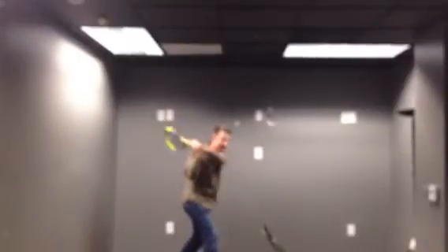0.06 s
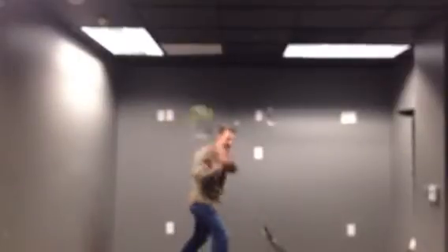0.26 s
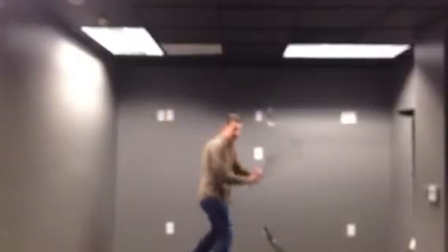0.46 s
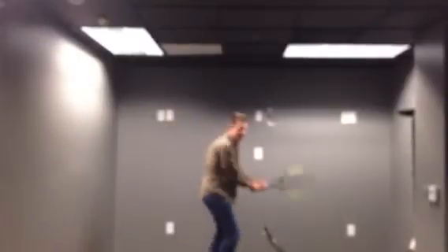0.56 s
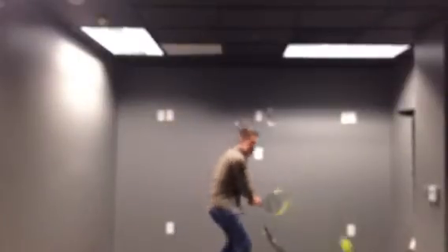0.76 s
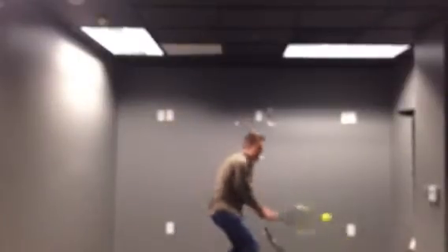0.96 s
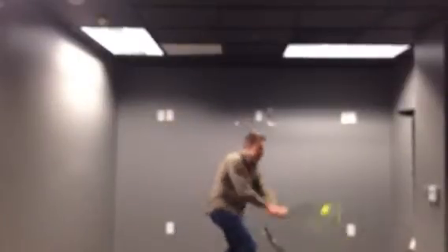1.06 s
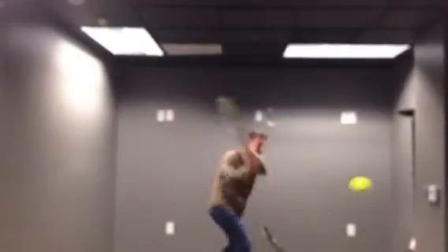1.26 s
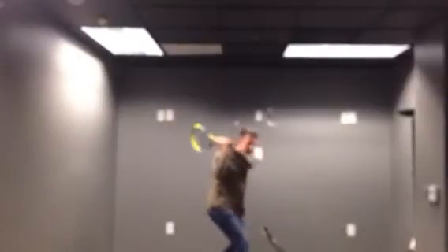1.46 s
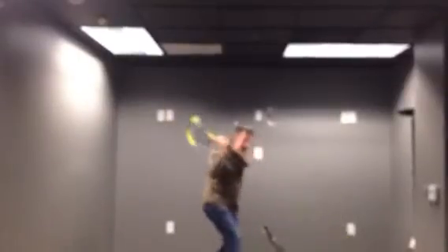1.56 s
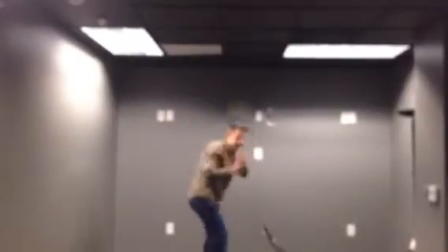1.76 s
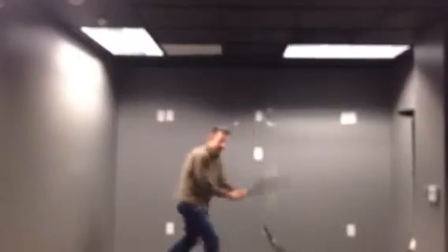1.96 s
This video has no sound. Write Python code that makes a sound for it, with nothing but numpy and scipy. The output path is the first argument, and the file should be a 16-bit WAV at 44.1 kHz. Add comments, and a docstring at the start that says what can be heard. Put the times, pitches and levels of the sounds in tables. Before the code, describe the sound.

A tennis ball smacks a hard wall twice, close and booming, in a small echoing room

```python
"""In a small, hard, echoing room a tennis ball is rallied against the near wall, beside the microphone.
Ventilation, filtered noise, hums faintly; shoes and shaken walls thud as low decaying sines.
Loose fittings tick; two ball bounces and a faint shoe knock reach the ear by discrete paths and reverberation.
The racket cracks at the far end as coloured reflections with a ringing ping; the first stroke is a dying echo.
Loudest are two blows on the wall panel, whose damped modes crack and boom into the room's echo."""
import sys
import numpy as np
from scipy import signal
from scipy.fft import rfft, irfft
from scipy.io import wavfile
from scipy.ndimage import uniform_filter1d

SR = 44100
rng = np.random.default_rng(int(sys.argv[2]) if len(sys.argv) > 2 else 0)


def digitize_waveform(pressure):
    """Quantize a signal to 16-bit integers and store it at the path in sys.argv[1].

    Rows of a 2-D input are taken as channels; values are limited to [-1, 1].
    """
    field = np.atleast_2d(pressure).T
    bounded = np.clip(field, -1, 1)
    quanta = np.round(bounded * 32767).astype(np.int16)
    wavfile.write(sys.argv[1], SR, quanta)


N = 90405  # length in samples


def from_db(db):
    """Decibels are logarithmic: 20 dB is a tenfold amplitude gain."""
    return 10 ** (np.asarray(db) / 20)


def at_hz(points, hz):
    """Pitch is logarithmic: a (Hz, value) table is interpolated along log frequency."""
    points = np.array(points)
    return np.interp(np.log(np.maximum(hz, 1)), np.log(points[:, 0]), points[:, 1])


def add(out, start_s, sound):
    """Superposition: pressures add; whatever falls outside the scene is cropped."""
    start = int(round(start_s * SR))
    sound = sound[max(-start, 0):N - start]
    start = max(start, 0)
    out[start:start + len(sound)] += sound


def seconds():
    """Sampled time: sample number over sample rate."""
    return np.arange(N) / SR


def unit_energy(x):
    """Energy is the sum of squares; scale it to that of one unit click."""
    return x / np.sqrt(np.sum(x ** 2))


def colour(x, points):
    """Minimum-phase filtering: the folded cepstrum of a (Hz, dB) response gives a causal filter."""
    size = 2 ** 17
    hz = np.arange(size // 2 + 1) * SR / size
    cepstrum = irfft(np.log(from_db(at_hz(points, hz))))
    # fold negative time onto positive time
    cepstrum[1:size // 2] *= 2
    cepstrum[size // 2 + 1:] = 0
    response = np.exp(rfft(cepstrum))
    return irfft(rfft(x, size) * response)[:N]


def ring(force, hz, t60):
    """Driven damped oscillator: a two-pole resonator answers a unit click with a sine of height near 1."""
    radius = from_db(-60 / (t60 * SR))
    angle = 2 * np.pi * hz / SR
    feedback = [1, -2 * radius * np.cos(angle), radius * radius]
    return signal.lfilter([0, np.sin(angle)], feedback, force + 1e-18)


def tone(hz, db, t60):
    """Free damped vibration: a sine loses 60 dB in each t60."""
    t = seconds()
    return from_db(db - 60 * t / t60) * np.sin(2 * np.pi * hz * t)


def scatter(envelope, count=6):
    """Phase dispersion: random phases smear a click while its spectrum stays even."""
    x = rng.standard_normal(len(envelope)) * envelope
    for _ in range(count):
        spectrum = rfft(x, 2 * len(x))
        flat = spectrum / (np.abs(spectrum) + 1e-12)
        x = irfft(flat)[:len(x)]
    return np.pad(unit_energy(x), (0, N - len(x)))


def early():
    """Early reflections: dense arrivals modelled as noise that builds and dies quickly."""
    t60_s, build_s = 0.22, 0.0015
    t = seconds()
    decay = from_db(-60 * t / t60_s)
    return unit_energy(rng.standard_normal(N) * decay * (1 - np.exp(-t / build_s)))


def echo():
    """Diffuse reverberation: absorption varies with frequency, so each third-octave has its own decay."""
    # The room's decay. Each row: frequency in Hz, t60 in seconds.
    room_t60 = [(60, 0.54), (180, 0.54), (350, 0.42), (550, 0.33), (800, 0.44), (1100, 0.55), (1500, 0.61),
                (2100, 0.76), (3200, 0.72), (5000, 0.6), (8000, 0.32), (14000, 0.56)]
    build_s, size = 0.0009, 2 ** 16
    t = np.arange(size) / SR
    hz = np.arange(size // 2 + 1) * SR / size
    noise = rfft(rng.standard_normal(size))
    out = np.zeros(size)
    for low in 20 * 2 ** (np.arange(30) / 3):
        band = irfft(noise * ((hz >= low) & (hz < low * 2 ** (1 / 3))))
        centre = low * 2 ** (1 / 6)
        out += band * from_db(-60 * t / at_hz(room_t60, centre))
    out *= 1 - np.exp(-t / build_s)
    return np.pad(out, (0, N - size)) / np.sqrt(SR / 20)


def ventilation():
    """Stationary broadband noise: spectral shaping leaves a low rumble under a faint hiss."""
    # Spectrum of the air noise. Each row: frequency in Hz, relative level in dB.
    air_colour = [(20, -37), (40, -7.5), (58, 3), (85, -11.5), (190, -16), (300, -19.5), (500, -29),
                  (1500, -27.5), (3000, -33.5), (15000, -40)]
    air = colour(rng.standard_normal(N), air_colour)
    return from_db(-61) * air / np.std(air)


def thumps():
    """Soft impact: gradual contact rounds the onset of a damped low mode, for shoes and shaken walls."""
    # Each row: start in seconds, level in dB before the onset is rounded, frequency in Hz, t60 in seconds.
    thump_rows = [(0.295, -28, 55, 0.43), (0.300, -8.5, 100, 0.079), (0.718, -33.5, 149.6, 0.058),
                  (0.882, -40.5, 57, 0.16), (0.883, -42, 121, 0.15), (1.652, -13, 112, 0.082),
                  (1.681, -11.5, 162, 0.065), (1.714, -21, 180, 0.089)]
    contact_s = 0.0029
    onset = 1 - np.exp(-(seconds() / contact_s) ** 2)
    out = np.zeros(N)
    for start_s, db, hz, t60 in thump_rows:
        add(out, start_s, tone(hz, db, t60) * onset)
    return out


def rattle():
    """Secondary impacts: loose fittings, shaken by the blows, tick as brief scattered clicks."""
    # Each row: start in seconds, gain in dB.
    ticks = [(0.2278, -7), (1.6226, -13), (1.6264, -14), (1.6335, -8), (1.659, -13)]
    # Spectrum of a tick. Each row: frequency in Hz, gain in dB.
    tick_colour = [(400, -19), (1500, -4.5), (4500, -8), (6500, -13.5), (9000, -20), (15000, -33.5)]
    early_db = -10.5
    out = np.zeros(N)
    for start_s, db in ticks:
        add(out, start_s, from_db(db) * (scatter(np.ones(30)) + from_db(early_db) * early()))
    return colour(out, tick_colour)


def floor_knocks():
    """Impact and image sources: delayed copies and reverberation repeat each knock; modes ring on."""
    # Two ball bounces and, between them, a faint shoe knock.
    # Each row: start in seconds, gain in dB, low-pass cutoff in Hz.
    knocks = [(0.6252, -5.5, 6000), (0.837, -26.5, 600), (1.9956, -7.5, 1870)]
    # Spectrum of a knock on the floor. Each row: frequency in Hz, gain in dB.
    knock_colour = [(60, 10), (170, 17), (480, 22.5), (700, 11.5), (1150, 7), (1450, 1.5), (2200, -4.5),
                    (2900, -18), (3900, -16.5), (6000, -29), (14000, -34)]
    # Ball and floor resonances. Each row: frequency in Hz, t60 in seconds,
    # level in dB at the first bounce, level in dB at the last.
    bounce_modes = [(180, 0.21, -31.5, -31), (323.7, 0.21, -48, -38), (414.5, 0.14, -37, -46),
                    (506, 0.18, -31.5, -39.5), (695, 0.081, -41, -34.5), (1044, 0.11, -32.5, -50.5),
                    (1273, 0.026, -43, -34.5)]
    # First paths to the microphone. Each row: delay in seconds, gain in dB.
    knock_paths = [(0, -7), (0.004, -6), (0.0105, -8), (0.027, -13)]
    early_db, echo_db = 1, -2
    out = np.zeros(N)
    for start_s, db, dull_hz in knocks:
        paths = from_db(early_db) * early() + from_db(echo_db) * echo()
        for delay_s, path_db in knock_paths:
            add(paths, delay_s, from_db([path_db]))
        pop = colour(paths, knock_colour)
        dulled = signal.lfilter(*signal.butter(1, dull_hz, fs=SR), pop)
        add(out, start_s, from_db(db) * dulled)
    # only the ball bounces, first and last, set the modes ringing
    for bounce, (start_s, *_) in enumerate((knocks[0], knocks[-1])):
        for k, (hz, t60, *mode_db) in enumerate(bounce_modes):
            add(out, start_s, (-1) ** k * tone(hz, mode_db[bounce], t60))
    return out


def racket():
    """Direct and reverberant fields: a far crack is thin, its bass comes by echo; strings, frame and room ring."""
    # Each row: start in seconds, gain in dB.
    strokes = [(-0.26, -9.5), (1.147, -0.5)]
    # Ball on the strings. Each row: frequency in Hz, gain in dB.
    stroke_colour = [(50, -7.5), (110, 11.5), (190, 19), (300, 14.5), (450, 2), (620, 8.5), (740, -3.5),
                     (1100, 11.5), (1280, 5.5), (1520, 11.5), (2300, -3), (2800, -9.5), (4400, -10.5),
                     (8000, -19), (15000, -31.5)]
    # Ringing strings, frame and room. Each row: frequency in Hz, relative level in dB, t60 in seconds.
    ping_modes = [(199, 11, 0.5), (286, 7, 0.4), (610, -12, 0.92), (930, -7, 0.4), (1050, 5.5, 0.34),
                  (1125, 4, 0.46), (1500, 3, 0.68), (1560, 15.5, 0.21), (1620, -3.5, 0.43)]
    direct_db, early_db, echo_db, ping_db = -20, -1.5, 0.5, -51
    thin_hz = 320  # the first paths carry little bass
    ping = sum(tone(hz, ping_db + mode_db, t60) for hz, mode_db, t60 in ping_modes)
    out = np.zeros(N)
    for start_s, db in strokes:
        first = from_db(direct_db) * scatter(np.hanning(180)) + from_db(early_db) * early()
        first = signal.lfilter(*signal.butter(2, thin_hz, "high", fs=SR), first)
        crack = colour(first + from_db(echo_db) * echo(), stroke_colour)
        add(out, start_s, from_db(db) * (crack + ping))
    return out


def blow_force(start_s, contact_s, swell_db):
    """Impact excitation: a dull noise swell leads into a short contact with softened treble."""
    attack_s, rise_s, attack_dull_hz, crack_dull_hz = 0.021, 0.017, 3332, 7360
    t = seconds()
    rising = np.exp(t[t < attack_s] / rise_s) - 1
    swell = unit_energy(rng.standard_normal(len(rising)) * rising)
    swell = signal.sosfilt(signal.butter(6, attack_dull_hz, fs=SR, output="sos"), swell)
    contact = scatter(np.ones(int(contact_s * SR)))
    force = np.zeros(N)
    add(force, start_s - attack_s, from_db(swell_db) * swell)
    add(force, start_s, signal.lfilter(*signal.butter(2, crack_dull_hz, fs=SR), contact))
    return force


def wall():
    """Modal excitation: the spot struck sets how strongly each panel and room mode answers a blow."""
    # Each row: start in seconds, contact in seconds, gain of the swell in dB, thin tone in Hz, its level in dB,
    # boom's lead in seconds, boom's rise in seconds, gain of all modes in dB, gain of the echo in dB.
    wall_hits = [(0.2158, 0.0028, -15, 2755, -33, 0.00025, 0.0024, 3, 5.5),
                 (1.6132, 0.0018, -4, 3083, -26, 0.00043, 0.004, 2.5, 4.5)]
    # The panel's crack, its boom, and the low room resonances it wakes. Each row: frequency in Hz,
    # t60 in seconds, relative level in dB from the first spot, relative level in dB from the second.
    crack_modes = [(484, 0.027, -19.5, -12), (906, 0.026, -14.5, -18), (1423, 0.013, -15, -14),
                   (1812, 0.012, -10.5, -16), (2258, 0.02, -16, -15.5), (2810, 0.01, -10.5, -51),
                   (3320, 0.014, -11, -24.5), (4200, 0.0051, -19, -21.5), (4800, 0.0026, -26.5, -43.5),
                   (5767, 0.006, -23, -42)]
    boom_modes = [(60.5, 0.041, -36.5, -13.5), (118, 0.12, -12.5, -17.5), (173, 0.02, -22, -2.5),
                  (232.5, 0.095, -8, -28), (285.4, 0.15, -31.5, -18.5), (365, 0.061, -15, -24.5)]
    room_modes = [(92.6, 0.47, -24, -24.5), (138.45, 0.49, -31.5, -23), (164, 0.58, -19.5, -38.5),
                  (201.5, 0.71, -38, -33)]
    # Faint ring that lingers. Each row: frequency in Hz, level in dB.
    wall_ring = [(1265, -49.5), (1750, -46), (1852, -45), (2213, -47)]
    # Spectrum of the echo. Each row: frequency in Hz, gain in dB from the first spot, gain in dB from the second.
    wall_echo = np.array([(29.4, 13.5, 33), (63, 28.5, 25.5), (113, 32.5, 32), (197, 32, 30), (345, 19, 9),
                          (490, 20.5, 12), (750, 2.5, 4), (1240, 10.5, 5), (1710, 10, 7), (2350, 5, 6.5),
                          (2800, -7, -12), (3180, -1, -5), (5100, -12, -17.5), (8500, -29.5, -40.5),
                          (15000, -40, -51.5)])
    ring_t60_s, tone_swell_s, tone_lead_s = 0.75, 0.007, 0.021
    out, t = np.zeros(N), seconds()
    for spot, hit in enumerate(wall_hits):
        start_s, contact_s, swell_db, tone_hz, tone_db, lead_s, rise_s, modes_db, echo_db = hit
        force = blow_force(start_s, contact_s, swell_db)
        for k, (hz, t60, *spot_db) in enumerate(crack_modes):
            out += (-1) ** k * from_db(modes_db + spot_db[spot]) * ring(force, hz, t60)
        for hz, db in wall_ring:
            add(out, start_s, tone(hz, db, ring_t60_s))

        # a thin tone swells and fades around the blow
        age = t - start_s + lead_s
        tone_envelope = np.exp(-np.abs(age) / tone_swell_s) * (age > -tone_lead_s)
        out += from_db(tone_db) * tone_envelope * np.sin(2 * np.pi * tone_hz * age)

        for k, (hz, t60, *spot_db) in enumerate([*boom_modes, *room_modes]):
            rise = np.exp(np.minimum(age, 0) / rise_s)
            decay = from_db(-60 * np.maximum(age, 0) / t60)
            boom = rise * decay * np.sin(2 * np.pi * hz * age)
            out += (-1) ** k * from_db(modes_db + spot_db[spot]) * boom
        add(out, start_s, from_db(echo_db) * colour(echo(), wall_echo[:, [0, 1 + spot]]))
    return out


def scene():
    """Linear superposition: the room's own noise and the rally sum in mono."""
    return (ventilation() + thumps() + rattle() + floor_knocks() + racket() + wall())[None]


def record(dry):
    """Band-limiting and compression: bass and top are cut, loud blows duck the gain, peaks are rounded."""
    low_hz, cutoff_hz, peak = 39.7, 15600, 0.74
    duck_above_db, duck_share, duck_attack_s, recover_db_per_s = -22, 0.47, 0.024, 12.5
    x = signal.lfilter(*signal.butter(2, low_hz, "high", fs=SR), dry[0])

    power = np.abs(uniform_filter1d(x ** 2, size=441))  # 10 ms mean
    level_db = 10 * np.log10(power + 1e-12)
    over_db = duck_share * np.maximum(level_db - duck_above_db, 0)
    # hold the largest reduction, released at a steady rate
    recovered_db = recover_db_per_s * seconds()
    held_db = np.maximum.accumulate(over_db + recovered_db) - recovered_db
    pole = np.exp(-1 / (duck_attack_s * SR))
    x = x * from_db(-signal.lfilter([1 - pole], [1, -pole], held_db))

    x = x / (1 + (x / peak) ** 8) ** (1 / 8)  # soft limit
    return signal.sosfilt(signal.ellip(10, 0.1, 80, cutoff_hz, fs=SR, output="sos"), x)[None]


dry = scene()
out = record(dry)
digitize_waveform(out)
```